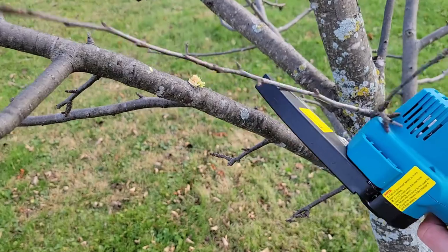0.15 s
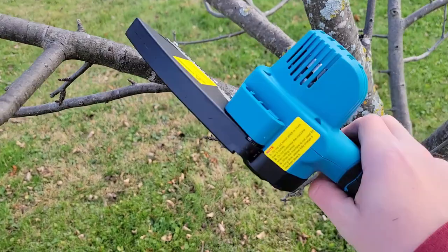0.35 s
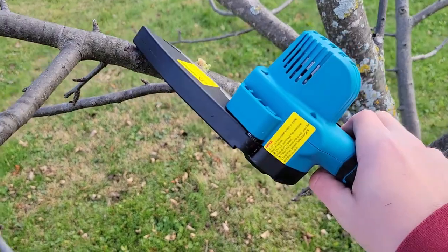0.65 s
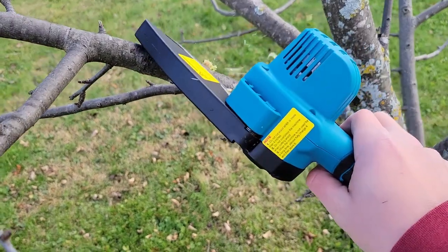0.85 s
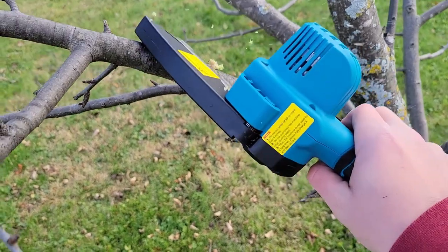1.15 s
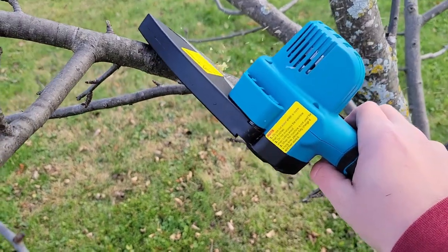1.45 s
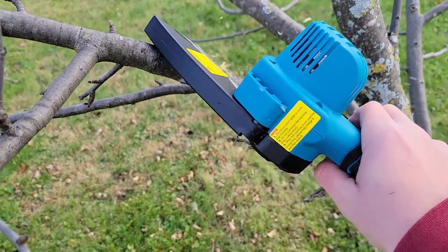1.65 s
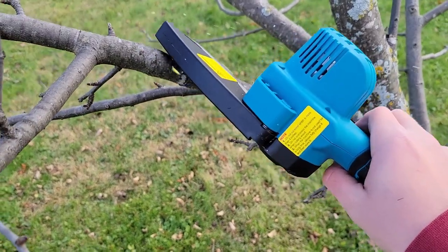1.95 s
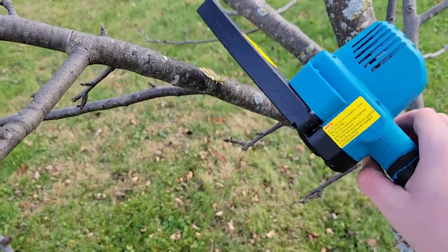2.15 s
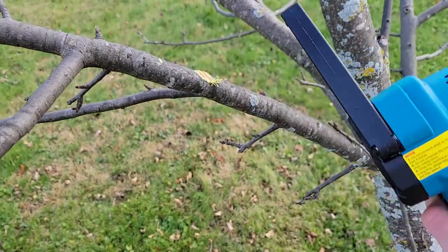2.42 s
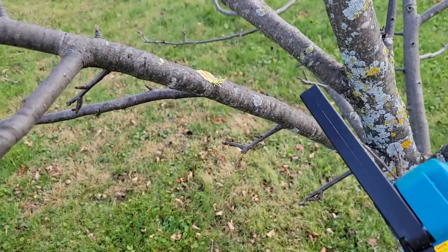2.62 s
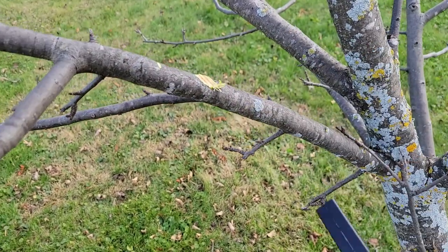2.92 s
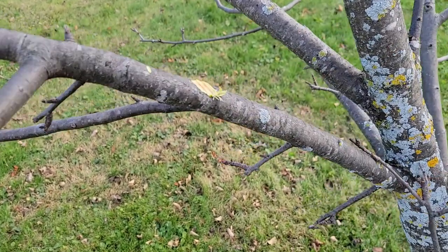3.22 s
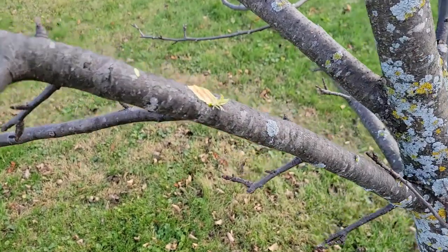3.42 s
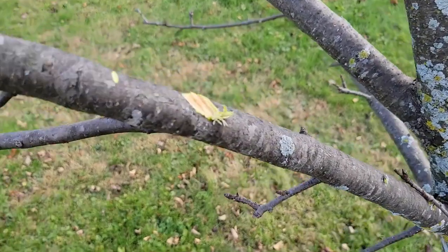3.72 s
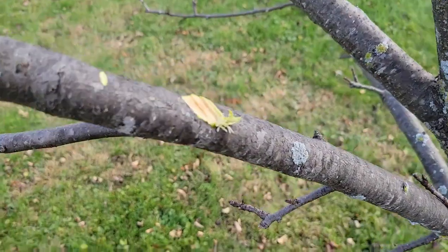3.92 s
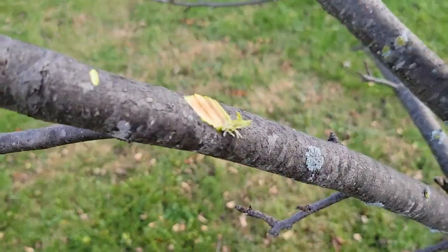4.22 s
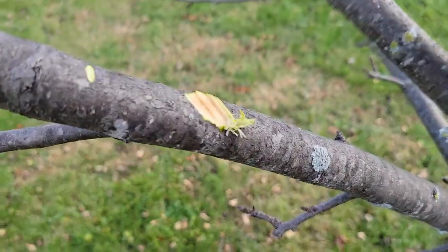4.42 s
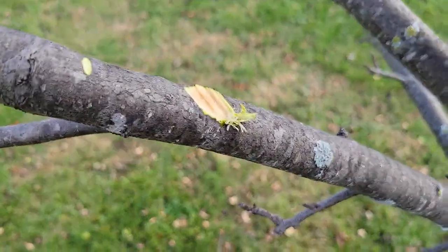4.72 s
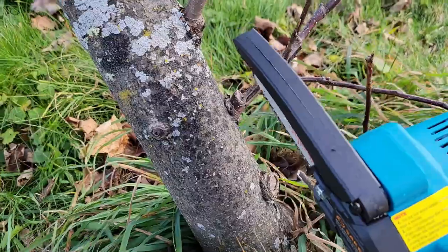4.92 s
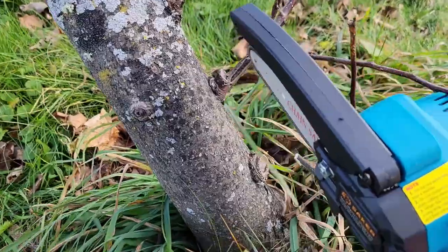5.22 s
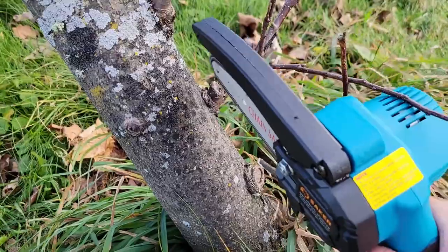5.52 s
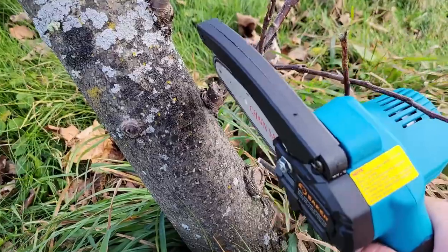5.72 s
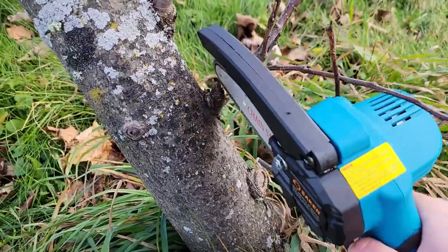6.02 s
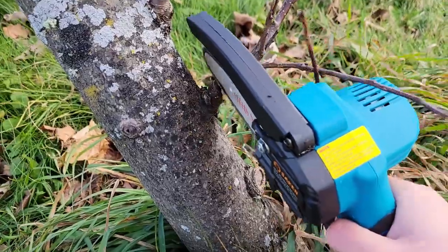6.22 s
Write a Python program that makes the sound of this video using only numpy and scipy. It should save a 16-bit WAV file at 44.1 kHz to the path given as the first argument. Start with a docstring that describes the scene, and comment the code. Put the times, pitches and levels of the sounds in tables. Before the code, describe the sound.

Outdoor close recording of a handheld electric saw: bright chain rattle, whining sprocket, rough knocks of teeth in wood. A short run-down comes first, then about two seconds of cutting, then a slowing, clattering stop. Low wind rumble and faint leaf rustle with dry twig cracks follow. A trigger click restarts the saw, running freely until harsh knocks at the end. Dry open air, wind on the phone microphone.

```python
"""A hand-held battery chainsaw runs in three bursts, close to a phone's microphone in a windy garden.
Its links hit the sprocket in a whine that follows the motor; the chain rattles in its bar and plastic guard.
Cutters knock in the wood and snags drag the speed down: noise bursts timed by the passing links.
Filtered noise makes the wind on the microphone and the leaves; twigs tick in the pause."""
import sys
import numpy as np
from scipy import signal
from scipy.fft import rfft, irfft
from scipy.io import wavfile
from scipy.ndimage import uniform_filter1d, minimum_filter1d

SR = 44100
rng = np.random.default_rng(int(sys.argv[2]) if len(sys.argv) > 2 else 0)


def materialize(psi):
    """Save the field psi as 16-bit PCM at rate SR to the path in sys.argv[1].

    A 1-D psi becomes a single channel; in a 2-D psi each row is a channel.
    """
    bounded = np.clip(np.atleast_2d(psi).T, -1, 1)
    quanta = np.round(bounded * 32767).astype(np.int16)
    wavfile.write(sys.argv[1], SR, quanta)


N = 280476
TIME = np.arange(N) / SR  # s


def undb(db):
    """Decibels to gain."""
    return np.exp(np.asarray(db) * (np.log(10) / 20))


def unit(x):
    """Scale to rms 1."""
    return x / np.sqrt(np.mean(x ** 2) + 1e-18)


def curves(table):
    """Columns of a table, joined by straight lines in time."""
    s, *columns = np.transpose(table)
    return [np.interp(TIME, s, column) for column in columns]


def noise():
    """White noise."""
    return rng.standard_normal(N)


def colour(x, points):
    """Causal minimum-phase filter with the given (Hz, dB) response, made by folding its cepstrum."""
    size = 4096
    hz, db = np.transpose(points)
    bins = np.maximum(np.fft.rfftfreq(size, 1 / SR), 1)
    response_db = np.interp(np.log(bins), np.log(hz), db)
    cepstrum = irfft(np.log(undb(response_db)))
    cepstrum[1:size // 2] *= 2
    cepstrum[size // 2 + 1:] = 0
    impulse = irfft(np.exp(rfft(cepstrum)))
    return signal.fftconvolve(x, impulse)[:len(x)]


def ring(x, hz, width_hz):
    """One resonance, gain 1 at its centre."""
    return signal.lfilter(*signal.iirpeak(min(hz, SR / 3), hz / width_hz, fs=SR), x)


def walk(rate):
    """Random wander with rms 1: `rate` random points a second, joined by straight lines."""
    k = int(SR / rate)
    points = rng.standard_normal(N // k + 2)
    ramp = np.arange(k) / k
    lines = points[:-1, None] + np.diff(points)[:, None] * ramp
    return unit(lines.ravel()[:N])


def steady(x, seconds):
    """Hold the short-term rms at 1."""
    return x / np.sqrt(np.abs(uniform_filter1d(x ** 2, int(seconds * SR))) + 1e-12)


def swell(s, length):
    """A smooth rise and fall around a moment."""
    return np.exp(-np.minimum(((TIME - s) / length) ** 2, 20))


def puff(s, length):
    """A quick rise and a slower fall."""
    age = np.clip((TIME - s) / length, 0, 20)
    return (1 - np.exp(-age / 0.16)) * np.exp(-age)


def clicks(table, decay_s, width_hz, gain_db):
    """Short cracks: decaying noise, each through a broad double resonance of its own."""
    out, t = np.zeros(N), TIME[:SR // 32]
    for s, db, hz in table:
        burst = rng.standard_normal(len(t)) * np.exp(-t / decay_s)
        crack = ring(ring(burst, hz, width_hz), hz, width_hz)
        start = int(s * SR)
        out[start:start + len(t)] += crack / np.abs(crack).max() * undb(db + gain_db)
    return out


def garden():
    """Dense tiny crackles of dry leaves and grass brushed in passing, over faint open air."""
    # moments of brushing: (time [s], half length [s], level [dB])
    rustles = [(4.052, 0.46, -60.5), (4.035, 0.034, -59), (4.38, 0.072, -60.5), (4.9, 0.027, -48),
               (5.02, 0.1, -59.5), (5.123, 0.021, -35.5)]
    # spectrum of the leaves, before their papery rings: (frequency [Hz], level [dB per Hz])
    leaf_spectrum = [(1180, -27.5), (2000, 3.5), (3990, -3), (4420, -2), (5360, -2.5), (6240, -9),
                     (8310, -5), (11500, -9.5), (15000, -19.5)]
    # spectrum of the open air: (frequency [Hz], level [dB per Hz])
    air_spectrum = [(200, 0), (1000, 0), (2000, -14), (5000, -19.5), (10000, -24), (15000, -55.5)]
    brushing = sum(undb(db) * swell(s, length) for s, length, db in rustles)
    # about 1100 crackles a second, of very uneven strength
    grains = (rng.random(N) < 1100 / SR) * noise() * undb(2.8 * rng.exponential(size=N))
    leaves = steady(colour(unit(grains) + 0.5 * noise(), leaf_spectrum), 0.11)
    # each leaf cracks with a papery ring
    leaves = leaves + 0.43 * ring(leaves, 5500, 500) + 0.5 * ring(leaves, 8800, 1800)
    air = unit(colour(noise(), air_spectrum)) * undb(-53.5)
    return leaves * brushing * undb(1.0) + air


def wind():
    """Eddies thump the microphone port and flutter round it; rough puffs break on it at listed moments."""
    # wind on the microphone: (time [s], strength [dB])
    strength_points = [(0.0, -13.5), (0.51, -9.5), (0.8, -20), (0.94, -17), (2.78, -19), (2.85, -28),
                       (2.91, -19), (3.63, -13.5), (3.68, -26), (4.07, -6), (4.13, -12.5), (4.64, -8),
                       (4.84, -9), (4.94, -23), (4.99, -13.5), (5.14, -8.5), (5.28, -27), (5.37, -13),
                       (5.54, -17.5), (5.58, -10), (5.93, -25), (5.97, -18.5), (6.22, -19), (6.36, -25)]
    # spectra of the thumps, the flutter and the rough puffs: (frequency [Hz], level [dB per Hz])
    buffet_spectrum = [(12, -48.5), (20, -26), (47, -2.5), (69, -3), (116, -4.5), (230, -23), (400, -35),
                       (520, -63), (880, -120)]
    flutter_spectrum = [(110, -18.5), (180, 5.5), (300, -1.5), (500, -16.5), (800, -34.5), (1500, -47.5),
                        (3000, -72)]
    puff_spectrum = [(150, -15.5), (350, 1), (520, 1), (900, -16.5), (1500, -34), (3000, -52.5)]
    # puffs that break on the microphone: (time [s], length [s], strength [dB])
    breaking = [(0.162, .1, -20), (0.313, 0.068, -18.5), (0.363, 0.035, -22), (0.461, 0.019, -25),
                (0.504, 0.06, -23), (3.12, 0.016, -29), (3.27, 0.11, -34), (3.45, .04, -33),
                (4.027, 0.026, -15), (4.064, 0.024, -23), (4.175, 0.028, -20), (4.301, 0.02, -19),
                (4.429, .02, -22), (4.522, .025, -24), (4.562, .025, -28), (4.718, 0.031, -17.5),
                (4.839, 0.0084, -22), (4.98, 0.054, -36), (5.634, 0.053, -24)]
    breeze_db = -17.5  # divides lulls from gusts
    wind_db, = curves(strength_points)
    lull_db, gust_db = np.minimum(wind_db - breeze_db, 0), np.maximum(wind_db - breeze_db, 0)

    highpass = signal.butter(2, 36, "high", fs=SR, output="sos")
    eddies = signal.sosfilt(highpass, colour(noise(), buffet_spectrum))
    buffet_db = wind_db + 0.3 + 0.033 * gust_db + 1.9 * walk(18)
    buffet = steady(eddies + 0.66 * ring(eddies, 61, 7.6), 0.08) * undb(buffet_db)

    # the flutter follows the wind closely in lulls, weakly in gusts, and flickers
    flutter_db = -33 + 0.9 * lull_db + 0.2 * gust_db + 3.5 * walk(45)
    puff_strength = sum(undb(db) * puff(s, length) for s, length, db in breaking)
    flutter = unit(colour(noise(), flutter_spectrum)) * (undb(flutter_db) + 0.65 * puff_strength)
    puffs = unit(colour(noise(), puff_spectrum)) * puff_strength * undb(-9.0)
    return buffet + flutter + puffs


def twigs():
    """Twigs tick: very short cracks with a broad resonance."""
    # (time [s], peak level before the gain [dB], centre [Hz])
    ticks = [(3.256, -46.5, 3190), (3.9005, -34.5, 5010), (3.9454, -36.5, 4500), (4.0085, -36, 6500),
             (4.021, -38, 3500), (4.028, -33, 6500), (4.042, -35, 7000), (4.0721, -28, 6960),
             (4.097, -30, 4200), (4.1419, -38, 5520), (4.21, -39, 5110), (4.2702, -27.5, 3700),
             (4.3718, -33, 7500), (4.395, -38, 4000), (4.4653, -36, 5000), (4.819, -37, 4950),
             (4.8803, -42, 5260), (4.895, -37, 3560)]
    return clicks(ticks, decay_s=0.0015, width_hz=5500, gain_db=-1)


def clacks():
    """The trigger clicks and the chain snaps taut or slack, as short cracks."""
    # (time [s], peak level before the gain [dB], centre [Hz])
    snaps = [(0.5177, -37, 4040), (0.5402, -11, 7400), (2.5486, -16, 9440), (2.572, -26, 8510),
             (5.1048, -18.5, 4250), (5.1287, -10.5, 7000)]
    return clicks(snaps, decay_s=0.0016, width_hz=2700, gain_db=-3.5)


def squeaks(length_s, glide, gain_db):
    """The slack chain squeaks in its groove: short rough tones that sag in pitch as the link slides."""
    # (time [s], level before the gain [dB], pitch before glide and roughness [Hz])
    slips = [(0.279, -9, 3170), (0.563, -16, 3090), (0.5757, -9, 2800), (2.4228, -12.5, 3600),
             (2.4708, -17, 3650), (5.1398, -14, 3590), (5.172, -16, 3230)]
    out, t = np.zeros(N), TIME[:SR // 10]
    envelope = t / length_s * np.exp(1 - t / length_s)
    for s, db, hz in slips:
        pitch = hz * (1 - glide * (t / length_s - 1) + 0.072 * walk(1000)[:len(t)])
        tone = np.sin(2 * np.pi * np.cumsum(pitch) / SR)
        start = int(s * SR)
        out[start:start + len(t)] += undb(db + gain_db) * envelope * tone
    return out


def bites():
    """The hardest bites into the trunk: short knocks, each with its own resonance."""
    # (time [s], peak level before the gain [dB], centre [Hz])
    hard_bites = [(6.196, -2, 1160), (6.26, -5, 2140), (6.28, -13, 2190), (6.312, 3, 1910)]
    return clicks(hard_bites, decay_s=0.0015, width_hz=1100, gain_db=-1)


def motor(pressed, released, load):
    """Link rate [Hz]: the motor spins up, sags under load a little late, and coasts down once let go."""
    free_hz, sag = 969, 0.21  # rate running free, share of it lost at full load
    inertia_s = 0.056  # time the motor takes to follow
    # drag slows the chain exponentially, dry friction pulls it on towards a rate this far below zero
    coast_s, friction_hz = 0.65, 744
    keep = np.exp(-1 / (inertia_s * SR))
    felt = load[0] + signal.lfilter([1 - keep], [1, -keep], load - load[0])
    spin_up = 1 - np.exp(-np.maximum(TIME - pressed, 0) / inertia_s)
    driven = free_hz * (1 - sag * felt) * spin_up
    rate_at_release = np.interp(released, TIME, driven)
    coasting = (rate_at_release + friction_hz) * np.exp(-(TIME - released) / coast_s) - friction_hz
    return np.maximum(np.where(TIME < released, driven, coasting), 50)


def knocks(turns, scatter_db, jitter, decay_s):
    """A burst of chatter at each whole turn, each with its own force and a little off beat."""
    at = np.flatnonzero(np.diff(np.floor(turns)))
    chance = rng.standard_normal((N // 32, 2))[:len(at)]
    late = jitter * chance[:, 1] / np.gradient(turns)[at]  # samples
    force = np.zeros(N)
    force[np.clip(at + late.astype(int), 0, N - 1)] = undb(scatter_db * chance[:, 0])
    energy = signal.lfilter([1], [1, -np.exp(-2 / (decay_s * SR))], force ** 2)
    return steady(np.sqrt(energy + 1e-12) * noise(), 0.12)


def jingle(drive, count, low_hz, high_hz, width_hz, swing_db):
    """Many narrow rings of links and rivets, each coming and going as the chain runs round."""
    pitches = low_hz * (high_hz / low_hz) ** ((np.arange(count) + rng.random(count)) / count)
    return unit(sum(ring(drive, hz, width_hz) * np.sqrt(hz) * undb(swing_db * walk(18)) for hz in pitches))


def rattle(links, slack, body, treble_db):
    """Every second link carries a cutter that slaps the bar, over the scrape of the groove."""
    # narrow rings of the guard and bar: (centre [Hz], width [Hz], level over the body [dB])
    guard_rings = [(2010, 42, -7.5), (4960, 200, -16), (7500, 500, -26.5), (9350, 250, -16)]
    # freer rings of the bar under a slow, slack chain: (centre [Hz], width [Hz], level over the body [dB])
    slack_rings = [(1080, 190, -1), (2100, 110, 0.5), (2860, 300, -4.5), (3584, 370, 6), (5300, 180, -4.5),
                   (9400, 310, -5)]
    scrape = (0.48 + 0.85 * slack) * noise()
    slaps = knocks(links / 2, scatter_db=2.0, jitter=0.083, decay_s=0.0027) + scrape
    steel = jingle(slaps, count=30, low_hz=1139, high_hz=11140, width_hz=68, swing_db=5.0)
    chain = colour(slaps + undb(-14) * steel, body)
    chain = chain + sum(undb(db) * ring(chain, hz, width) for hz, width, db in guard_rings)
    chain = chain + slack * sum(undb(db) * ring(chain, hz, width) for hz, width, db in slack_rings)
    # the chain whips about in its groove, so body and treble flicker on their own
    dull = signal.sosfiltfilt(signal.butter(3, 6200, fs=SR, output="sos"), chain)
    treble_share = np.clip(undb(treble_db) ** 2, 0, 0.9)  # of the power
    low = np.sqrt(1 - treble_share) * steady(dull, 0.1) * undb(0.5 * walk(90))
    high = np.sqrt(treble_share) * steady(chain - dull, 0.22) * undb(1.0 * walk(110))
    return steady(low + high, 0.28) * undb(0.25 * walk(70))


def cutter_chips(links, load, drag):
    """Cutters knock in the wood: only about one in three takes a chip; a snag tears out bigger ones."""
    # knock of a cutter in wood: (frequency [Hz], level [dB per Hz])
    wood_spectrum = [(250, -14), (600, -10), (1150, -1.5), (1600, -8.5), (2150, 2), (3000, -8.5),
                     (6000, -18.5), (15000, -29)]
    chops = knocks(links / (2 * 3), scatter_db=5, jitter=0.3, decay_s=0.0026)
    return (load ** 1.5 + 4.0 * drag) * steady(colour(chops, wood_spectrum), 0.088)


def sprocket_whine(links, load, slack):
    """Links mesh with the seven-tooth sprocket: sines at multiples of the link rate, sevenths from its turn."""
    # (multiple of the link rate [ratio], level before the meshing gain [dB])
    partials = [(3 / 7, -15), (1 / 2, -17), (0.99, 0), (9 / 7, -18.5), (7 / 4, -8.5), (1.8, -8.5),
                (15 / 7, -19.5), (16 / 7, -4.5), (4.4, -10), (9 / 2, -10)]
    tones = sum(undb(db + 1.1 * walk(90)) * np.sin(2 * np.pi * k * links) for k, db in partials)
    # wood and a slack chain both make the meshing of the links softer and uneven
    uneven_db = (3.0 * load + 5.1 * slack) * walk(40)
    return tones * undb(-12.0 - 3.5 * load - 25 * slack + uneven_db)


def saw(burst, body):
    """One burst: chain rattle, cutters in the wood and the sprocket's whine, all timed by the link rate."""
    # how hard the cutters press into wood: (time [s], load [0-1])
    load_points = [(0, 0.43), (0.07, 0.11), (0.6, 0.36), (0.85, 0.37), (0.93, 0.55), (1.01, 0.38),
                   (1.27, 0.41), (1.36, 0.16), (1.46, 0.45), (1.56, 0.35), (1.66, 0.45), (1.75, 0.26),
                   (1.83, 0.53), (1.92, 0.2), (2.1, 0.07), (5.4, 0.06), (6.05, 0), (6.14, 0.35),
                   (6.23, 0.93), (6.36, 0.87)]
    # rattle, chips and whine swell and dip as the saw is moved about: (time [s], level [dB])
    sway = [(0.05, 4.4), (0.65, 0.6), (0.8, 0.6), (0.9, 1.6), (1.3, 0.5), (1.55, 0.4), (1.65, 1),
            (2.25, 1.15), (2.6, 1), (5.2, 0), (5.36, 0), (5.47, 2), (5.6, -1.8), (5.7, 1), (6.0, 0.1),
            (6.17, 0.4), (6.33, 0)]
    # teeth snagging in the branch: (time [s], half length [s], speed lost [share])
    snags = [(1.148, 0.012, 0.06), (1.203, 0.0098, 0.057), (1.257, .011, 0.067), (1.317, 0.015, .06),
             (1.464, .013, .07), (1.512, 0.015, 0.095), (1.689, 0.0088, 0.049)]
    # bands that flare up: (time [s], half length [s], centre [Hz], width [Hz], level over the rattle [dB])
    flares = [(0.17, 0.16, 3900, 550, 1), (0.74, 0.17, 7200, 800, -5), (2.33, 0.15, 2050, 110, -9),
              (2.42, 0.096, 3030, 219, -10), (5.166, 0.03, 3500, 300, -8), (5.383, 0.24, 7650, 494, -10),
              (6.106, 0.07, 2140, 446, -5)]
    knee_hz, growth = 615, 1.38  # loudness grows as a power of the speed and levels off above the knee
    take_up_s, attack_s = 0.0225, 0.018  # the chain moves this long after the trigger, then builds up
    pressed, released, stop, level_db = burst

    load = np.clip(curves(load_points)[0], 0, 1)
    link_hz = motor(pressed, released, load)
    loudness = undb(level_db + curves(sway)[0]) * np.tanh(link_hz / knee_hz) ** growth
    slack = np.clip(1 - link_hz / 900, 0, 1)
    drag = sum(loss * swell(s, length) for s, length, loss in snags)
    wobble = (0.0016 + 0.012 * load + 0.03 * slack) * walk(70)
    link_hz = link_hz * (1 - drag) * (1 + wobble)
    links = np.cumsum(link_hz) / SR  # links passed so far

    # tight and loose stretches of the chain come round once a lap of 56 links
    lap = sum(np.sin(2 * np.pi * (k * links / 56 + rng.random())) for k in range(1, 4))
    moving_s = np.maximum(TIME - pressed - take_up_s, 0)
    # duller as the chain slows, and in the first moments of a burst
    treble_db = -3.0 - 7.5 * slack ** 2 - 10 * np.exp(-moving_s / 0.018)
    judder_db = 1.1 * load * walk(90)  # the chain judders in the cut
    chain = rattle(links, slack, body, treble_db) * undb(0.14 * lap + judder_db)
    chain = chain + sum(undb(db) * swell(s, length) * ring(chain, hz, width)
                        for s, length, hz, width, db in flares)
    chips = cutter_chips(links, load, drag)
    whine = sprocket_whine(links, load, slack)
    build_up = np.minimum(moving_s / attack_s, 1) ** 0.645
    running = build_up * np.clip((stop - TIME) / 0.0083 + 1, 0, 1)
    return (chain + undb(-2.0) * chips + whine) * loudness * running


def scene():
    """Two bursts on the branch, one at the trunk, all in the wind."""
    # pulls of the trigger: (pressed [s], released [s], start of the final fade [s], level [dB])
    bursts = [(-0.5, 0.143, 0.302, -15), (0.5195, 2.12, 2.6, -11.5), (5.105, 6.5, 7.0, -10.5)]
    # bar, chain and guard heard from above (on the branch): (frequency [Hz], level [dB per Hz])
    body_above = [(300, -23.5), (580, -16.5), (1100, -7), (1800, -9), (2100, -3), (3100, -4), (3800, -10),
                  (4950, -5), (6100, -10), (7700, -2.5), (10300, -7.5), (12000, -12), (15500, -16.5)]
    # the same heard from the side (at the trunk): (frequency [Hz], level [dB per Hz])
    body_side = [(300, -16), (580, -17.5), (1100, -4.5), (1600, -6), (2100, 1), (2900, -3.5), (4300, -5),
                 (4950, -2), (6100, -9), (7600, -1), (8900, -5.5), (11300, -8.5), (12300, -13),
                 (15500, -17.5)]
    bodies = [body_above, body_above, body_side]
    surroundings = garden() + wind() + twigs()
    cutting = sum(saw(burst, body) for burst, body in zip(bursts, bodies))
    slipping = squeaks(length_s=0.0054, glide=0.022, gain_db=-5.0)
    return (surroundings + clacks() + slipping + bites() + cutting)[None]


def record(dry):
    """The phone's limiter turns peaks down to full scale, then a steep low-pass cuts the top."""
    size = 200  # samples over which the limiter looks and smooths
    headroom = np.minimum(1, 1 / (np.abs(dry) + 1e-9))
    gain = uniform_filter1d(minimum_filter1d(headroom, size), size)
    lowpass = signal.ellip(12, 0.1, 80, 15720, fs=SR, output="sos")
    return signal.sosfilt(lowpass, dry * gain)


dry = scene()
out = record(dry)
materialize(out)
```